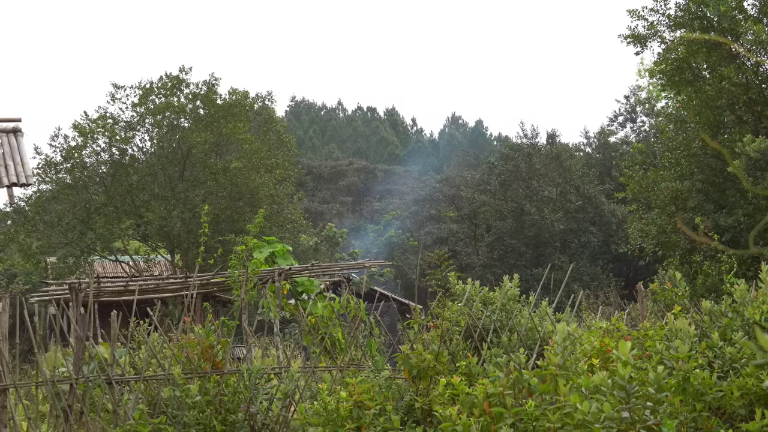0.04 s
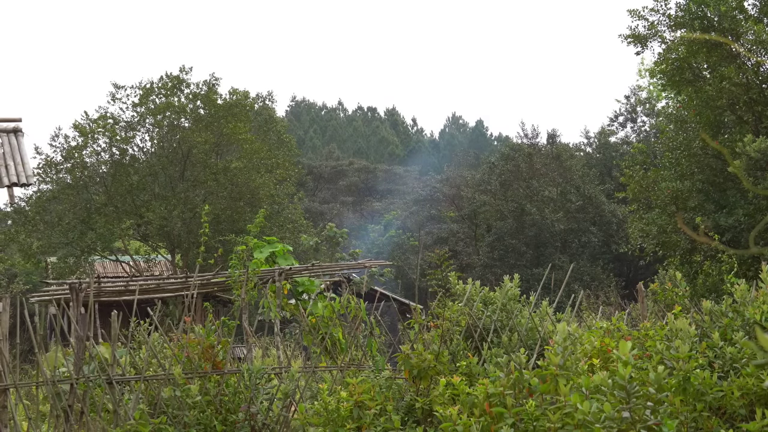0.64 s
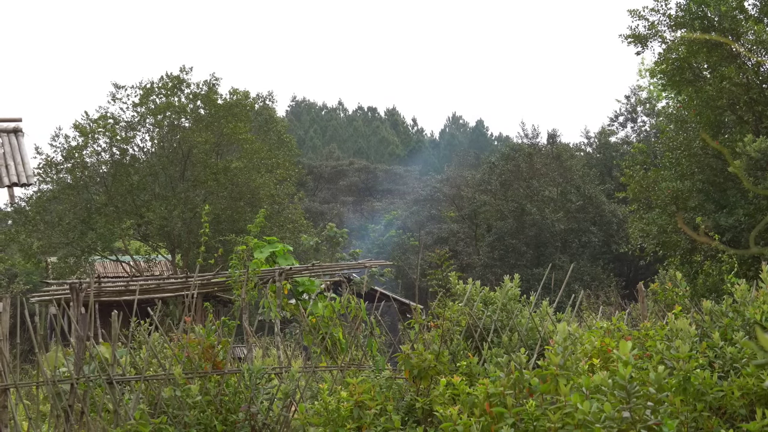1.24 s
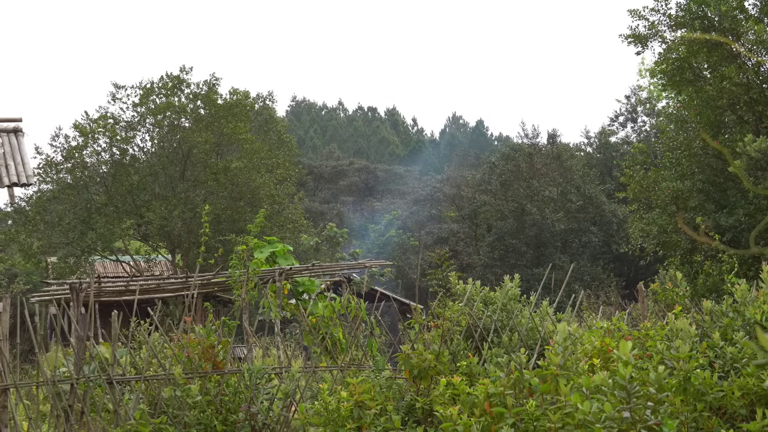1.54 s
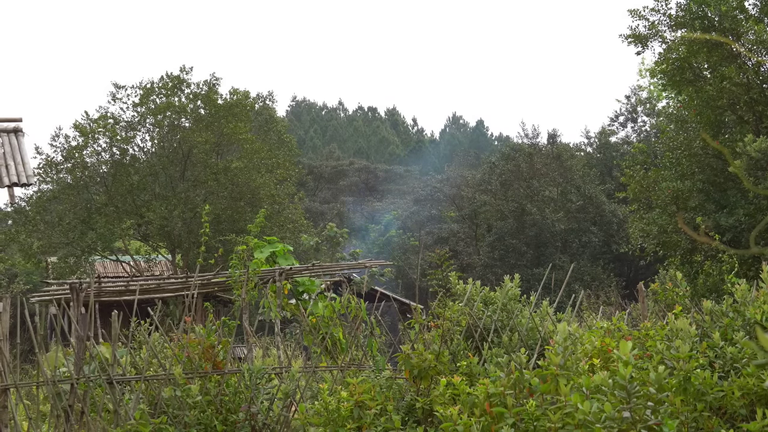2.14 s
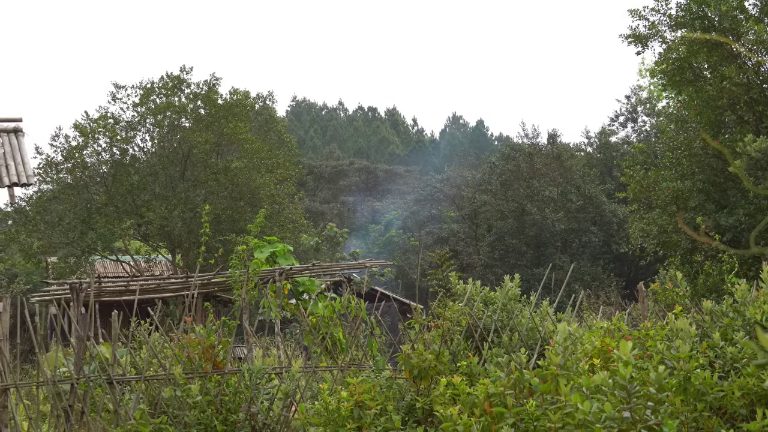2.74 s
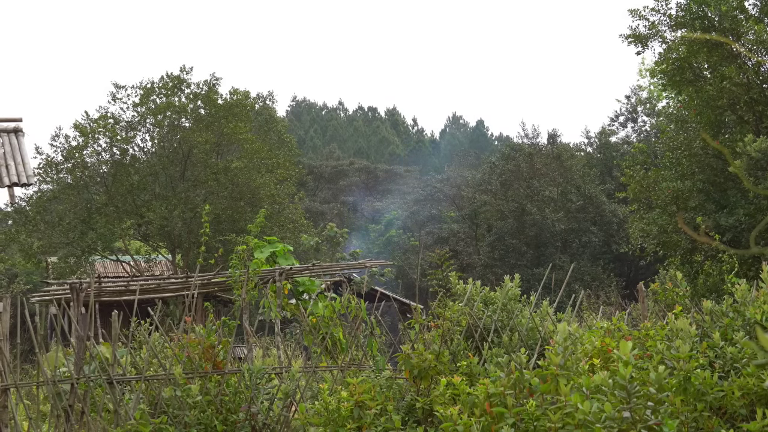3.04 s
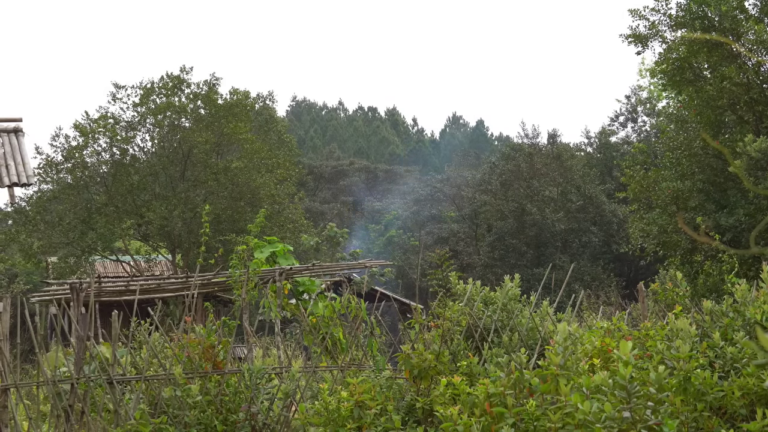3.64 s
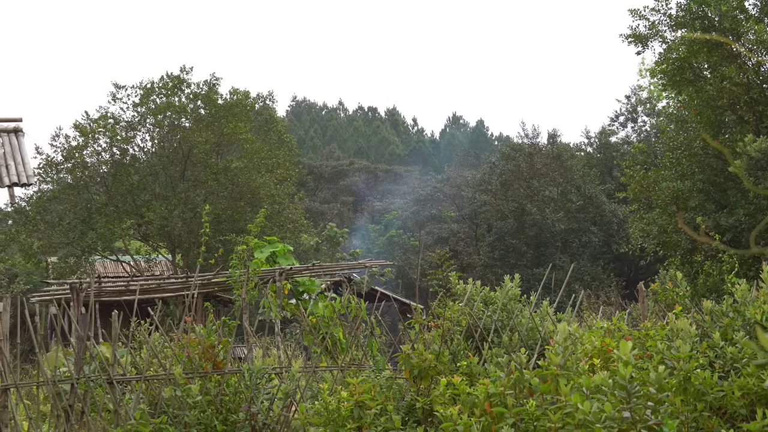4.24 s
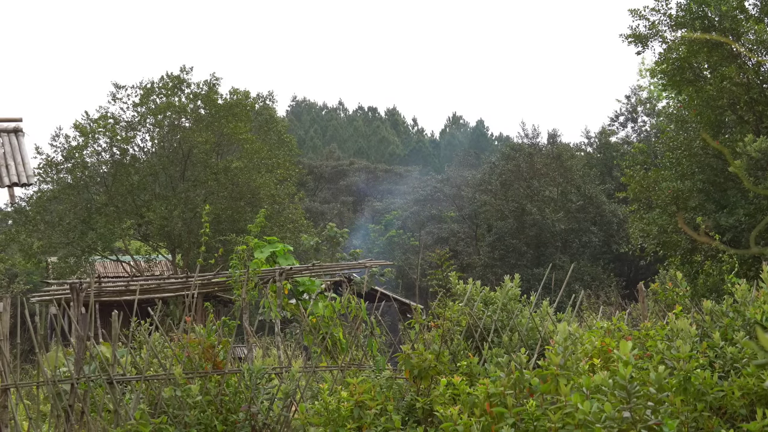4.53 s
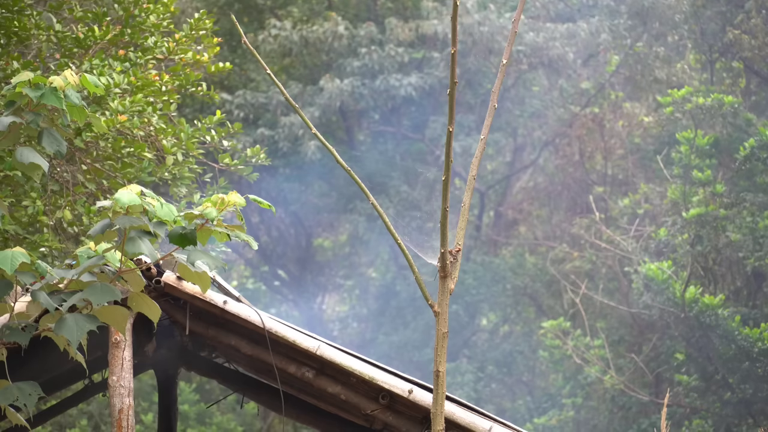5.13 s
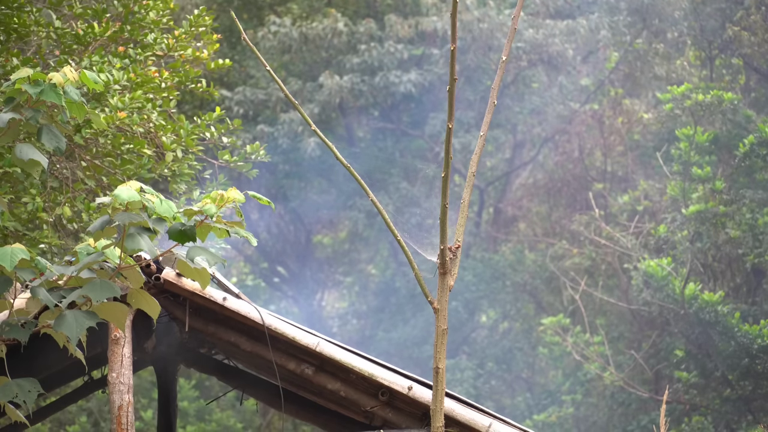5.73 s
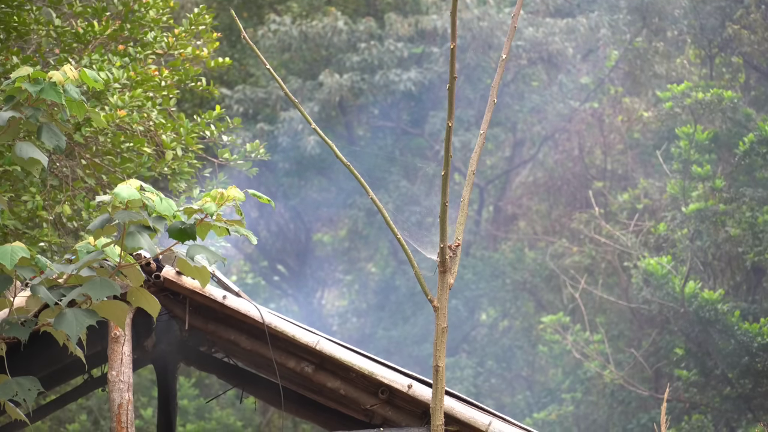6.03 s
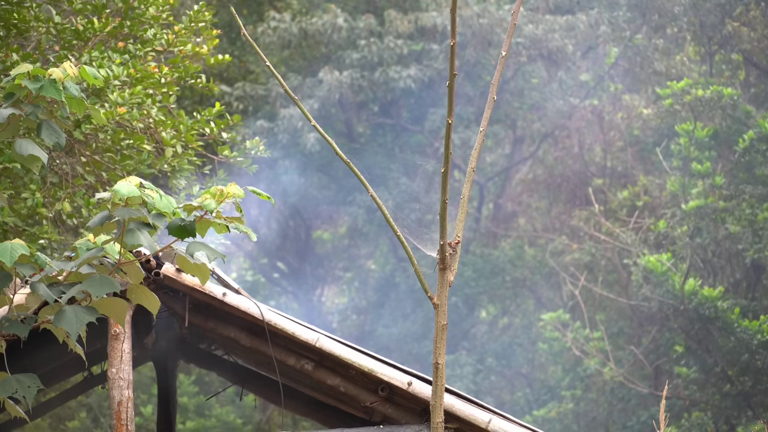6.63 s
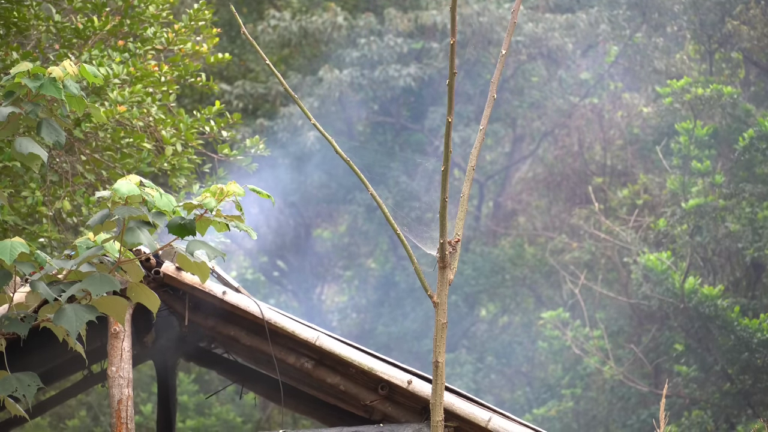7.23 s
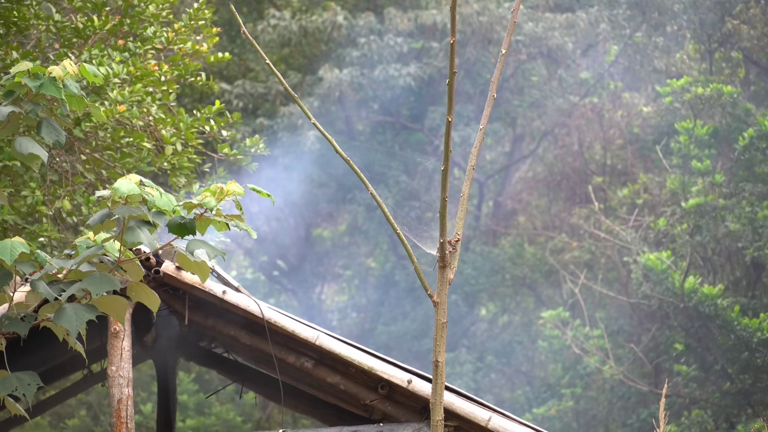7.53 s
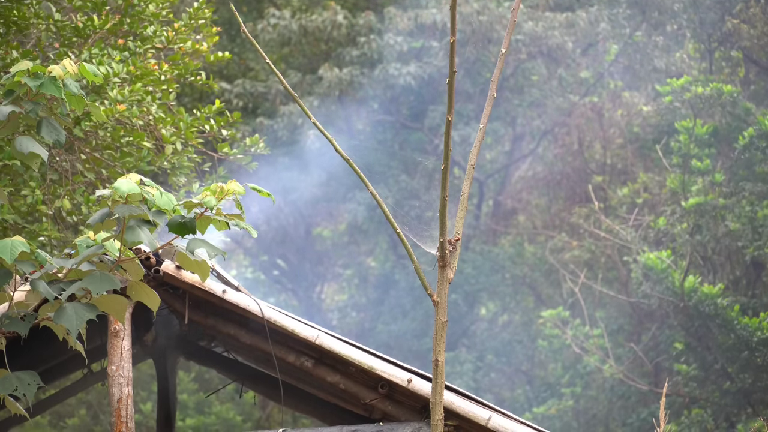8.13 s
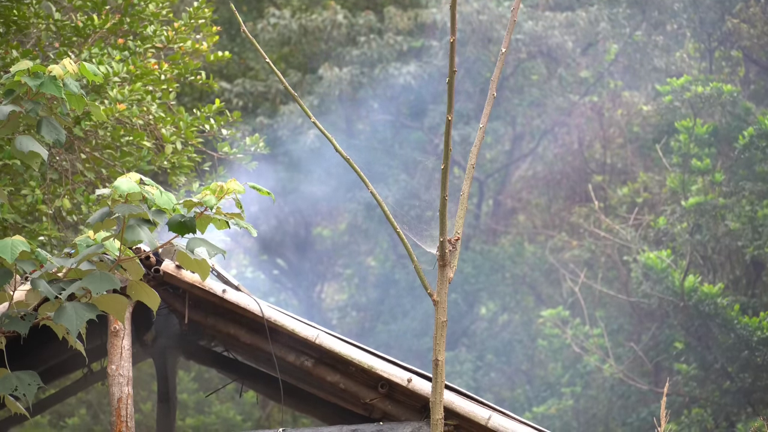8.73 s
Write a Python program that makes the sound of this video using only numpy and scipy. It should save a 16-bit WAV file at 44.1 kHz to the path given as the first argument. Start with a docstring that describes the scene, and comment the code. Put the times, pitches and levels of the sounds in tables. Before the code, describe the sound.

Cicadas drone steadily in the trees around a rural garden while songbirds trade short whistles, slurs and raspy chips with a light echo. A far bird gives a few low, falling whistles, and a distant engine throbs faintly under soft open air. Halfway through, the microphone moves nearer the wood: the cicadas swell and one close by winds up twice in rising steps. Small insects shimmer, and a few brief hisses pass.

```python
"""Cicadas drone in the trees around a rural garden, their buckling ribs ringing their hollow bodies.
Halfway the listening spot moves nearer the wood: the drone swells and a near cicada winds up twice.
Songbirds trade held whistles, slurs and raspy chips, a far bird gives long falling whistles, and the
trees scatter their calls back. A distant engine throbs through its exhaust under a bed of open air,
small insects shimmer and pip, and brief hisses rush past."""
import sys
import numpy as np
from scipy import signal
from scipy.io import wavfile

SR = 44100
rng = np.random.default_rng(int(sys.argv[2]) if len(sys.argv) > 2 else 0)


def bounce(signal):
    """Save signal as a 16-bit WAV file at the path given by the first command-line argument."""
    frames = np.transpose(np.atleast_2d(signal))
    limited = np.clip(frames, -1, 1)
    pcm = np.round(limited * 32767).astype(np.int16)
    wavfile.write(sys.argv[1], SR, pcm)


N = 391166
TIME = np.arange(N) / SR
MOVE_AT_S, MOVE_S = 5.04, 0.0807   # the listening spot moves nearer the wood
NOTE_EDGE_S = .013   # fade at each end of a pure bird note


def from_db(db):
    """Decibels to gain."""
    return 10 ** (np.asarray(db) / 20)


def rms_one(x):
    """Scale to unit power."""
    return x / np.sqrt(np.mean(x ** 2) + 1e-20)


def in_time(points):
    """An automation curve, read at every sample."""
    return np.interp(TIME, *np.transpose(points))


def at_hz(points, hz):
    """Read a spectrum on a log-frequency axis."""
    f, value = np.transpose(points)
    return np.interp(np.log(hz), np.log(f), value)


def spot(pair):
    """Slide a setting from its value at the first listening spot to that at the second."""
    return np.interp(TIME, [MOVE_AT_S, MOVE_AT_S + MOVE_S], pair)


def envelope(t, length, attack, release):
    """Straight attack, hold, straight release."""
    return np.clip(np.minimum(t / attack, (length - t) / release), 0, 1)


def drift(rate, size=N):
    """Smooth random motion with about rate turns a second, spread 1."""
    points = rng.standard_normal(20000) * np.sqrt(3 / 2)
    return np.interp(np.arange(size) * rate / SR, np.arange(20000), points)


def turn(hz):
    """Running phase of a moving frequency."""
    return 2 * np.pi * np.cumsum(hz) / SR


def panned(left_db):
    """Channel gains for a pan, given as left over right in dB."""
    return from_db([[left_db / 2], [-left_db / 2]])


def spread(pair, alike):
    """Two unrelated signals become left and right with correlation alike."""
    mid = np.sqrt(1 + alike) * pair[0]
    side = np.sqrt(1 - alike) * pair[1]
    return np.array([mid + side, mid - side]) / np.sqrt(2)


def resonate(x, hz, width):
    """A steep resonance, gain 1 on top."""
    band = signal.butter(2, [hz - width / 2, hz + width / 2], "band", fs=SR, output="sos")
    return signal.sosfilt(band, x)


def noise_band(centre, width):
    """Two unrelated narrow noises around a moving pitch."""
    lowpass = signal.butter(2, width / 2, fs=SR, output="sos")
    slow = signal.sosfilt(lowpass, rng.standard_normal((2, 2, N)))
    phase = turn(centre)
    return rms_one(slow[0] * np.cos(phase) + slow[1] * np.sin(phase))


# Stereo image of the noise beds: (frequency [Hz], left-right correlation [0-1])
STEREO_IMAGE = [(40, 1), (100, 0.99), (170, 0.72), (300, .2), (600, 0.016), (1500, 0.066), (4000, 0.15),
                (8000, 0.032), (13000, 0.37)]

def coloured(spectrum):
    """Stereo noise at unit power, shaped in half-octave bands."""
    edges = np.geomspace(18, 18000, 21)
    white, out = rng.standard_normal((2, 2, N)), 0
    for k, (low, high) in enumerate(zip(edges, edges[1:])):
        hz = np.sqrt(low * high)
        if high > spectrum[0][0] and low < spectrum[-1][0]:
            band = resonate(white[k % 2], (low + high) / 2, high - low)
            out += from_db(at_hz(spectrum, hz)) * spread(band, at_hz(STEREO_IMAGE, hz))
    return rms_one(out)


def chorus(bodies, pulse_hz, depth, alike):
    """Many cicadas blur into noise in their body resonances; the closest one's pulse shows through."""
    buckling = 1 + depth * np.cos(turn(pulse_hz * (1 + 0.00402 * drift(3))))
    drive = rng.standard_normal((2, 2, N)) * buckling
    ring = sum(from_db(db + .5 * drift(2.56)) * rms_one(resonate(drive[k % 2], hz, width))
               for k, (hz, width, db) in enumerate(bodies))
    return rms_one(spread(ring, alike))


# Body resonances of the far cicadas: (centre [Hz], width [Hz], relative level [dB])
FAR_RESONANCES = [(3675, 650, -5), (4083, 490, 0), (4424, 440, -8.5)]

def far_cicadas(level_db=(-43, -45)):
    """A wide, even drone of ringing bodies up in the trees."""
    return from_db(spot(level_db)) * chorus(FAR_RESONANCES, pulse_hz=350, depth=0.3, alike=0.055)


# Tone of the three air beds: (frequency [Hz], relative noise density [dB])
RUMBLE_EQ = [(20, -27), (30, -14.5), (52, 4), (75, -2), (110, -2.5), (150, -17.5), (210, -23.5), (400, -52)]
AIR_EQ = [(100, -8), (200, -4), (350, -5.5), (560, -2), (1000, -5.5), (1600, -7.5), (2600, -4.5),
          (5600, -15), (7200, -13), (10000, -16), (15000, -20.5)]
BREEZE_EQ = [(130, -7.5), (200, 10.5), (290, -8.5), (400, -5), (900, -9), (2000, -20.5), (6000, -13),
             (14000, -26)]
# Fader ride of the breeze: (time [s], level [dB])
BREEZE_RIDE = [(0, -54), (5, -60), (5.3, -50.5), (6.3, -47.5), (8.87, -46.5)]

def open_air(rumble_db=-45, air_db=-46):
    """A low rumble, a broad wash of air and a breeze that lifts halfway."""
    bed = from_db(rumble_db) * coloured(RUMBLE_EQ) + from_db(air_db) * coloured(AIR_EQ)
    return bed + from_db(in_time(BREEZE_RIDE)) * coloured(BREEZE_EQ)


# Tone of the exhaust: (frequency [Hz], relative level [dB])
EXHAUST_EQ = [(40, -37), (60, -30), (80, 0.5), (101, -1), (122, 0), (145, -7), (175, -16), (210, -47.5),
              (300, -10), (400, -30)]
# Fader ride of the engine: (time [s], level [dB])
ENGINE_RIDE = [(0, -50), (.9, -46.5), (1.8, -44.5), (2.2, -51.5), (2.9, -43), (5, -44), (5.15, -56),
               (6.2, -47), (7.5, -45.5), (8.87, -50)]

def engine(firing_hz=(20.3, 24), unsteady_db=3):
    """Orders of the firing rate, shaped by the exhaust and fading in and out over the distance."""
    rate, throb = spot(firing_hz), 0
    phase = turn(rate * (1 + 0.00797 * drift(4)))
    for k in range(2, 14):
        gain = from_db(at_hz(EXHAUST_EQ, k * rate) + unsteady_db * drift(5))
        throb += gain * np.sin(k * phase + rng.uniform(0, 2 * np.pi))
    return from_db(in_time(ENGINE_RIDE)) * rms_one(throb)


# The far bird's calls: (time [s], length [s], fundamental [Hz], scoop [Hz], sink [Hz/s],
# second partial [dB], third partial [dB])
FALLING_CALLS = [(-.1, 0.8, 531.5, -0.5, 75.4, -51.5, -72), (2.461, 1.23, 657.8, 114, 145.8, -49.5, -39.5),
                 (6.64, .48, 471, 0, 16, -54.5, -59), (8.105, .055, 470, -0.5, 1050, -44, -60)]

def falling_whistles(scoop_s=.09, waver_db=1.5, jitter=0.005):
    """Far calls that arch and sink, heard on partials 2 and 3; the air makes each partial waver."""
    out = np.zeros(N)
    for s, length, top_hz, scoop_hz, sink, second_db, third_db in FALLING_CALLS:
        t = np.clip(TIME - s, 0, length)
        hz = top_hz - sink * t - scoop_hz * np.exp(-t / scoop_s)
        phase = turn(hz * (1 + jitter * drift(90)))
        progress = t / length
        swell = envelope(progress, 0.97, attack=0.099, release=0.28)
        flare = np.exp(-((progress - .28) / .12) ** 2)   # the third partial flares early
        for k, gain in ((2, from_db(second_db)), (3, from_db(third_db) * flare)):
            out += np.sqrt(2) * swell * gain * from_db(waver_db * drift(25)) * np.sin(k * phase)
    return out * panned(.5)


def trees(x, t60, build_s=0.0083):
    """Trunks and leaves return countless small echoes, different at each ear."""
    t = TIME[:SR]
    echoes = rng.standard_normal((2, SR)) * from_db(-60 * t / t60) * (1 - np.exp(-t / build_s))
    echoes /= np.sqrt(np.sum(echoes ** 2, axis=1, keepdims=True))
    return signal.fftconvolve(x, echoes, axes=1)[:, :N]


def note_time(length):
    """The seconds within one bird note, with a little room for its fades."""
    return np.arange(int((length + NOTE_EDGE_S / 2) * SR)) / SR


# Glide cues: (time [s], length [s], start pitch [Hz], end pitch [Hz], level [dB], pan left [dB])
GLIDE_CUES = [(.083, .018, 2330, 2220, -36, 0), (.238, .03, 3650, 3080, -32.5, 1),
              (1.071, .17, 1820, 2680, -49.5, -6), (1.322, 0.021, 3400, 2900, -38, -6),
              (1.666, .031, 2330, 2950, -37.5, -5), (2.555, .03, 2450, 3150, -44, -3),
              (2.582, .035, 2300, 3050, -45, -3), (3.151, 0.075, 2050, 3400, -46, -5),
              (3.92, .08, 2480, 3050, -47, -1), (4.575, .17, 1780, 2640, -51.5, -6),
              (5.143, .05, 5550, 4850, -51, 2), (5.25, .08, 1980, 1700, -57, 0),
              (6.979, .03, 2200, 3200, -40, 11)]

def glides(rasp=0.14):
    """Clear notes that slide straight from one pitch to another."""
    for s, length, start_hz, end_hz, db, left_db in GLIDE_CUES:
        yield s, np.geomspace(start_hz, end_hz, len(note_time(length))), db, left_db, rasp


# Slur cues: (time [s], length [s], time to the dip [s], lowest pitch [Hz], end pitch [Hz],
# level at the dip [dB], pan left [dB], rasp [0-1])
SLUR_CUES = [(.09, .122, .036, 2000, 3520, -38.5, -1, .03), (4.974, .143, .05, 1935, 3800, -39.5, 1, .08),
             (7.376, 0.099, .004, 1890, 2760, -41, 5, .17)]

def slurs(swell_db=5):
    """Notes that dip, then swing up, growing louder as they climb."""
    for s, length, dip_s, low_hz, end_hz, db, left_db, rasp in SLUR_CUES:
        swing = (note_time(length) - NOTE_EDGE_S / 4 - dip_s) / (length - dip_s)
        hz = low_hz * (end_hz / low_hz) ** (swing ** 2)
        yield s, hz, db + swell_db * np.abs(swing), left_db, rasp


# Chip cues: (time [s], length [s], start pitch [Hz], end pitch [Hz], level [dB], pan left [dB])
CHIP_CUES = [(.34, 0.038, 2440, 2950, -40, -2), (.603, 0.071, 2600, 2960, -42.5, -3),
             (1.291, 0.028, 3280, 2370, -41, -6), (1.795, 0.033, 2510, 2850, -46, 3),
             (3.204, 0.052, 2800, 2700, -34.5, 9.5), (3.386, 0.025, 2575, 2370, -34.5, 6),
             (3.398, 0.045, 2860, 2775, -30.5, 10), (3.782, 0.04, 2400, 2725, -37.5, -6),
             (4.058, .05, 2450, 3410, -31.5, 5.5), (4.116, .035, 2650, 2955, -38, -3),
             (4.177, .027, 2760, 2480, -30, 4), (4.785, 0.028, 2480, 2280, -41, 0),
             (5.07, .07, 5800, 5400, -52, 0), (5.07, .05, 2300, 2700, -41, 8),
             (5.145, .018, 2650, 2150, -46, 2), (5.931, .071, 2140, 2890, -48.5, 3),
             (6.184, .055, 2830, 2650, -41.5, 12), (6.198, .17, 2250, 2660, -50, 2),
             (6.804, .056, 2545, 2370, -44.5, 10), (7.111, 0.053, 2516, 3380, -35, 10),
             (7.188, 0.071, 3530, 3450, -38, 12), (7.27, .091, 2240, 2810, -43, 7),
             (7.332, .04, 3250, 3320, -39, 13), (7.46, .12, 5660, 5660, -52, 2),
             (8.4, .05, 2170, 2050, -49, -2), (8.72, 0.07, 2050, 2450, -49, -3),
             (8.788, 0.092, 3380, 2480, -44.5, 11)]

def raspy_chips(trills_per_s=55, trill_hz=350, rasp=0.803):
    """Gritty notes whose pitch sweeps up again and again as it slides."""
    for s, length, start_hz, end_hz, db, left_db in CHIP_CUES:
        t = note_time(length)
        trill = trill_hz * ((trills_per_s * t + rng.random()) % 1 - .5)
        yield s, np.geomspace(start_hz, end_hz, len(t)) + trill, db, left_db, rasp


# Whistle cues: (time [s], length [s], pitch [Hz], droop [Hz], level [dB], pan left [dB], rasp [0-1])
WHISTLE_CUES = [(.362, .1, 2410, 130, -27, 0, .03), (.473, .072, 2100, 430, -39, 1, .04),
                (.558, .055, 2490, 110, -30, 0, .14), (1.93, 0.03, 2860, 0, -42, 1, .4),
                (2.298, 0.077, 3110, 0, -50, -6, .25), (2.476, .08, 3300, 0, -41.5, -3, .55),
                (3.93, .053, 3420, 0, -46, -3, .16), (4.21, .17, 2590, 0, -47, -2, .25),
                (4.42, .14, 2720, 0, -52, -2, .25), (5.11, .13, 3950, 150, -43, -6, .2),
                (6.995, .078, 3290, 0, -36, 9, .22), (7.36, .096, 3320, 70, -35, 16, .08),
                (7.468, .08, 2520, 260, -37, 6, .3), (7.555, .11, 2290, 40, -43, 9, .2)]
# One bird's motif: (time into it [s], length [s], pitch [Hz], droop [Hz], level [dB], rasp [0-1])
MOTIF = [(0, 0.112, 3420, 40, -41, .22), (.165, 0.077, 3530, 0, -43, .22),
         (0.303, .12, 2860, 110, -37, .08)]

def held_whistles(scoop_share=.12, scoop_s=.012, motif_starts_s=(1.235, 3.367), motif_left_db=-6.5):
    """Notes that scoop up to pitch and droop at the end; a bird on the right repeats a motif of three."""
    motifs = [(start + s, length, hz, droop, db, motif_left_db, rasp)
              for start in motif_starts_s for s, length, hz, droop, db, rasp in MOTIF]
    for s, length, hz, droop, db, left_db, rasp in list(WHISTLE_CUES) + motifs:
        t = note_time(length)
        scoop = 1 - scoop_share * np.exp(-t / scoop_s)
        yield s, hz * scoop - droop * (t / length) ** 2, db, left_db, rasp


def songbirds(rasp_hz=170, flutter_hz=520, waver_db=0.7, lead_s_per_db=4e-6):
    """Voice each pitch curve; rasp makes the tone flutter and break into noise. Gives (dry, echo send)."""
    direct, send = np.zeros((2, 2, N + SR))
    notes = (note for kind in (held_whistles, slurs, glides, raspy_chips) for note in kind())
    for s, hz, db, left_db, rasp in notes:
        size, at = len(hz), int((s - NOTE_EDGE_S / 4) * SR)
        # sound reaches the louder side first
        lead_s = lead_s_per_db * left_db * np.array([[.5], [-.5]])
        phase = turn(hz + rasp * rasp_hz * drift(296.8, size)) + 2 * np.pi * hz * lead_s
        swell = signal.windows.tukey(size, min(1, 2 * NOTE_EDGE_S * (1 + rasp) * SR / size))
        tone = np.sqrt(2) * (np.sin(phase) + from_db(-39) * np.sin(2 * phase))
        rough = drift(flutter_hz, size) * np.sin(phase) + drift(flutter_hz, size) * np.cos(phase)
        waver = from_db(waver_db * drift(56, size))
        note = from_db(db) * swell * rms_one(((1 - rasp) * tone + rasp * rough) * waver)
        direct[:, at:at + size] += note * panned(left_db)
        # notes above -35 dB come from nearer birds and carry less echo
        send_db = -0.59 * np.maximum(db + 35, 0)
        send[:, at:at + size] += note * panned(left_db / 2) * from_db(send_db)
    return direct[:, :N], send[:, :N]


def far_chatter(count=80, length_s=.07):
    """Birds deep in the wood add short random chirps."""
    out = np.zeros((2, N + SR))
    size = int(length_s * SR)
    for when, pitch, slope, side, loud in rng.random((count, 5)):
        hz = 2000 + 1150 * pitch + 900 * (slope - .5) * np.linspace(-1, 1, size)
        chirp = from_db(-56) * (1 + loud) * np.hanning(size) * np.sin(turn(hz))
        at = int(when * N)
        out[:, at:at + size] += chirp * panned(10 * (side - .5))
    return out[:, :N]


# Swells of the shimmer: (peak time [s], length [s], level [dB])
SHIMMER_CUES = [(1.1, 1.8, -58), (3.15, 1.9, -58.5), (4.6, 1.2, -63), (5.45, 1.2, -58), (8.35, .9, -55)]

def insect_shimmer(centre_hz=(7050, 6100), width_hz=950):
    """Small insects blend into a fine high band that comes in slow swells."""
    swell = sum(from_db(db) * np.cos(np.pi * np.clip((TIME - s) / length, -.5, .5))
                for s, length, db in SHIMMER_CUES)
    return swell * spread(noise_band(spot(centre_hz), width_hz), 0.071)


def arch(s, length):
    """A half-sine swell starting at s."""
    return np.abs(np.sin(np.pi * np.clip((TIME - s) / length, 0, 1)))


# Hiss cues: (time [s], length [s], level [dB])
HISS_CUES = [(3.183, 0.028, -36), (3.206, 0.027, -40.5), (4.936, .035, -48), (8.32, .11, -46.5)]
# Tone of the hiss: (frequency [Hz], relative noise density [dB])
HISS_EQ = [(2000, -16), (4500, -7), (6500, 1), (10500, -3.5), (15000, -7)]

def hisses():
    """Short soft puffs of bright noise."""
    swell = sum(from_db(db) * np.sqrt(arch(s, length)) for s, length, db in HISS_CUES)
    return swell * coloured(HISS_EQ)


def insect_pips(hz=5240, level_db=-56.5, from_s=3.377, period_s=.264, pair_s=.057, pip_s=0.019):
    """A thin insect pips in seven pairs at a steady pace."""
    gate = sum(arch(from_s + k * period_s + late, pip_s) for k in range(7) for late in (0, pair_s))
    return from_db(level_db) * gate * np.sqrt(2) * np.sin(2 * np.pi * hz * TIME)


def buzz(click_hz, smear_hz, centre_hz, width_hz):
    """Click harmonics, smeared by jitter and leaves, ring a cicada's body: two unrelated signals."""
    phase, ring = turn(click_hz * (1 + .002 * drift(1.5))), 0
    for k in range(12, 20):
        harmonic = np.array([drift(smear_hz) * np.cos(k * phase) + drift(smear_hz) * np.sin(k * phase)
                             for side in range(2)])
        body_gain = 1 / (1 + (2 * (k * click_hz - centre_hz) / width_hz) ** 2)
        ring += body_gain * harmonic
    return ring


# The clearest cicada's clicks quicken a little: (time [s], click rate [Hz])
CLICK_CURVE = [(5.6, 232), (6.3, 248), (7.2, 249.8), (8.87, 255)]

def steady_cicada(left_db=-2):
    """One cicada stands out of the chorus with a clear, level buzz."""
    ring = buzz(in_time(CLICK_CURVE), smear_hz=28, centre_hz=4200, width_hz=850)
    return rms_one(spread(ring, 0.44)) * panned(left_db)


# Body resonances of the near cicadas: (centre [Hz], width [Hz], relative level [dB])
NEAR_RESONANCES = [(4020, 290, 1.5), (4330, 500, 3), (4670, 260, -3), (5170, 220, -13.5)]
# Fader ride of the near cicadas, ahead of the trim for each spot: (time [s], level [dB])
NEAR_RIDE = [(5.15, -44), (5.2, -44), (6.83, -38.5), (7.03, -41.5), (8.57, -39.5), (8.87, -42.5)]

def near_cicadas(trim_db=(-80, 4)):
    """The chorus at the wood's edge and its clearest singer, opening up at the second spot."""
    crowd = from_db(-1.2) * chorus(NEAR_RESONANCES, pulse_hz=380, depth=0.29, alike=0.48)
    soloist = from_db(-4.5) * steady_cicada()
    return from_db(spot(trim_db) + in_time(NEAR_RIDE)) * (crowd + soloist)


# Wind-ups of the nearest cicada: (time [s], gain [dB])
WIND_UP_CUES = [(5.92, -39), (7.5, -38.5)]

def winding_cicada(slack_hz=3180, step_hz=330, first_step_s=.35, step_s=.26, glide_s=.06, left_db=-8):
    """The abdomen tightens in three steps, so its resonance climbs through the harmonics of the buzz."""
    centre, level = np.full(N, float(slack_hz)), 0
    for s, db in WIND_UP_CUES:
        steps = sum(np.clip((TIME - s - first_step_s - k * step_s) / glide_s, 0, 1) for k in range(3))
        centre = np.where(TIME >= s, slack_hz + step_hz * steps, centre)
        level += from_db(db) * envelope(TIME - s, length=1.12, attack=.26, release=.22)
    ring = buzz(click_hz=252, smear_hz=130, centre_hz=centre, width_hz=400)
    # a rasp spreads from the resonance upwards
    rasp = from_db(-2) * noise_band(centre + 190, width=750)
    # the slack abdomen sizzles most
    sizzle = from_db(-15) * (slack_hz / centre) ** 5 * noise_band(2.72 * centre, width=1900)
    return level * spread(ring + rasp + sizzle, 0.22) * panned(left_db)


def scene():
    """The mix: birds with their echoes, cicadas, small insects, the engine, hisses and open air."""
    song, send = songbirds()
    calls, chatter = falling_whistles(), far_chatter()
    birds = song + from_db(-3.5) * trees(send, t60=0.99)
    birds += from_db(-6.5) * trees(send, t60=0.15, build_s=0.0057)
    birds += calls + from_db(-4) * trees(calls, t60=0.73)
    birds += from_db(-2.5) * chatter + trees(chatter, t60=0.6)
    bed = far_cicadas() + near_cicadas() + open_air()
    return birds + bed + winding_cicada() + insect_shimmer() + insect_pips() + engine() + hisses()


def record(dry):
    """A steep high cut at 15.5 kHz."""
    return signal.sosfilt(signal.ellip(12, .1, 80, 15500, fs=SR, output="sos"), dry)


dry = scene()
out = record(dry)
bounce(out)
```